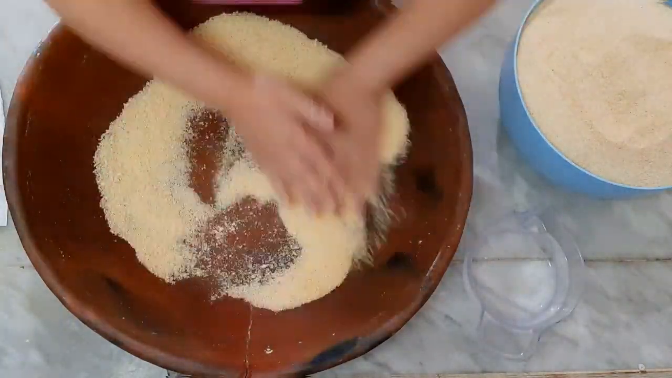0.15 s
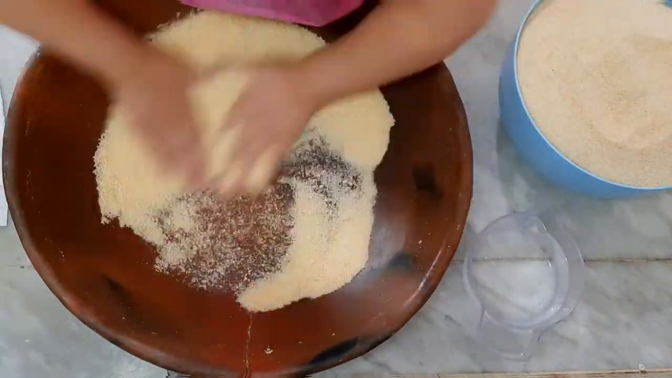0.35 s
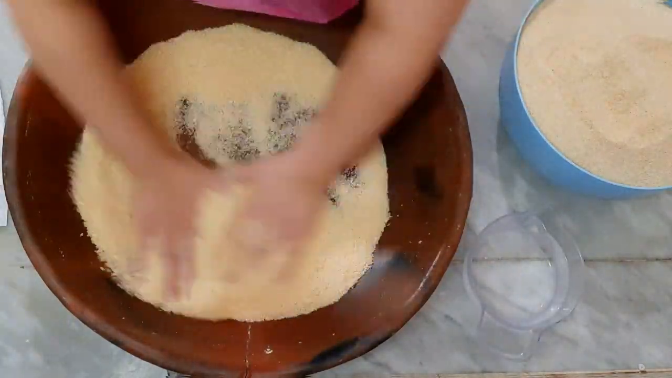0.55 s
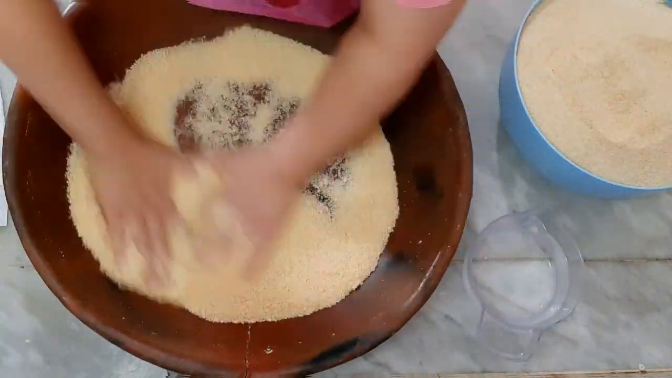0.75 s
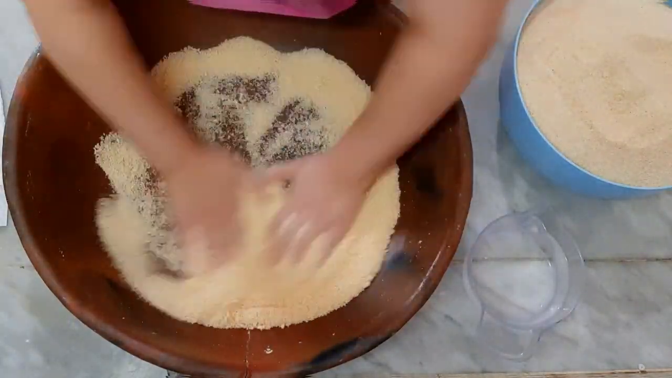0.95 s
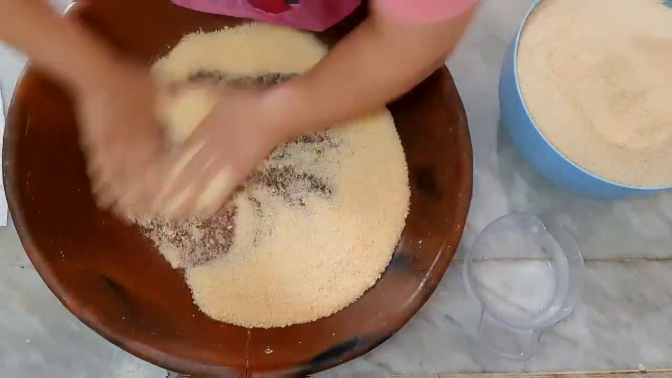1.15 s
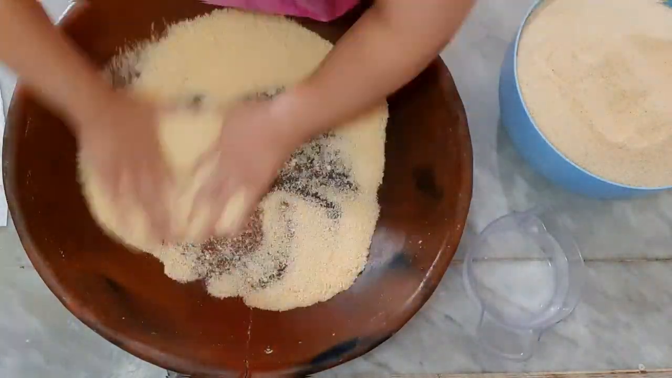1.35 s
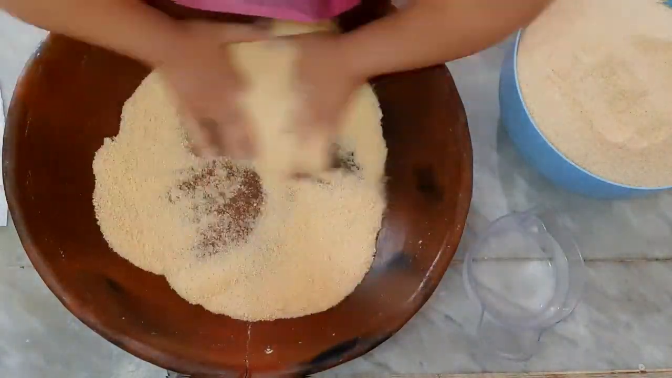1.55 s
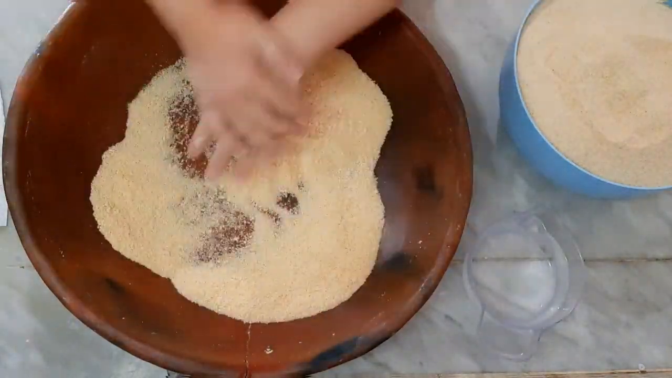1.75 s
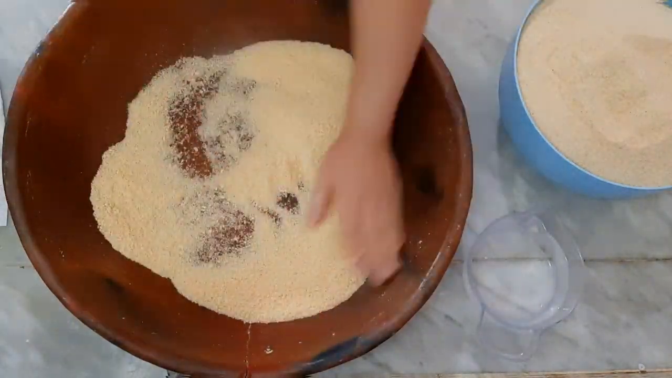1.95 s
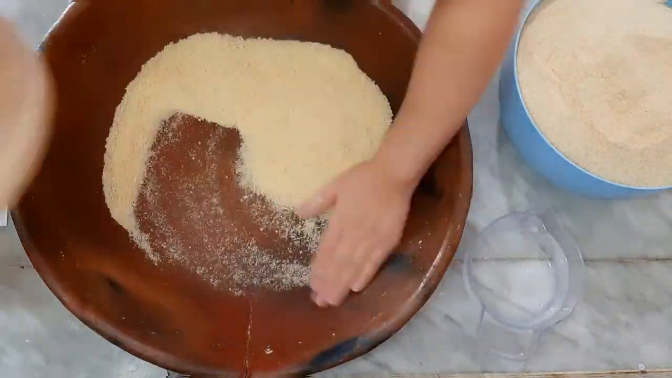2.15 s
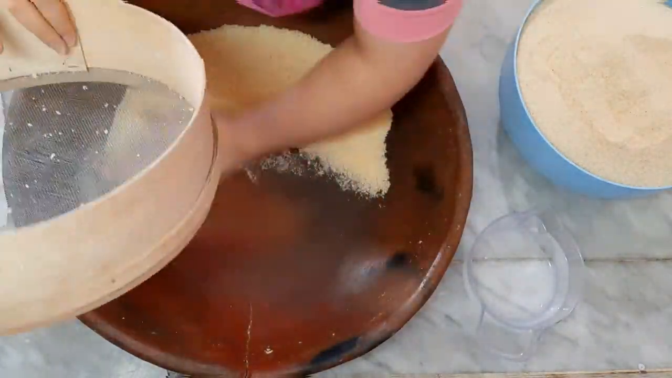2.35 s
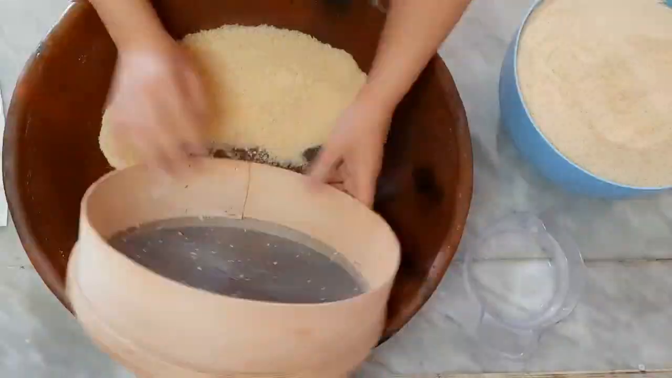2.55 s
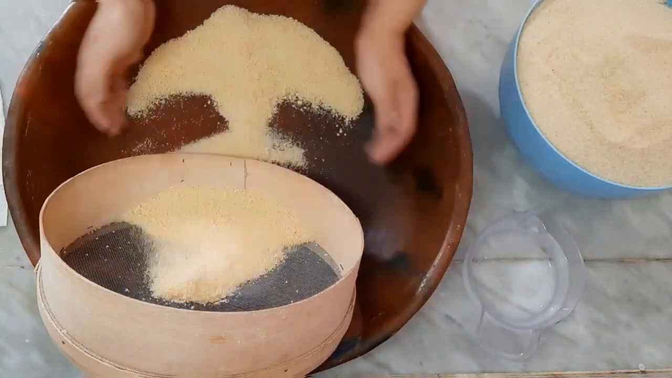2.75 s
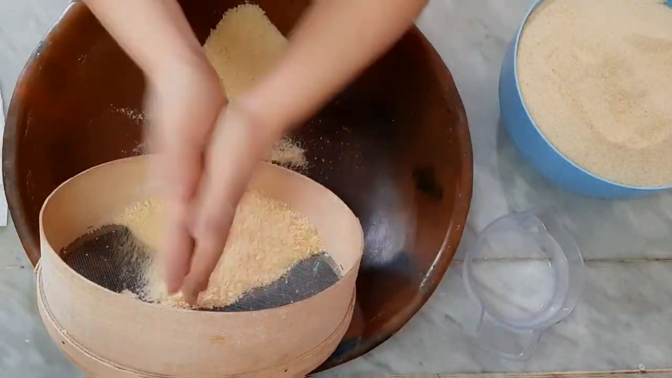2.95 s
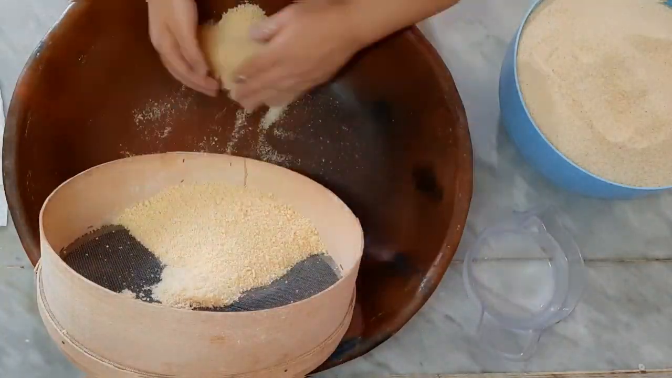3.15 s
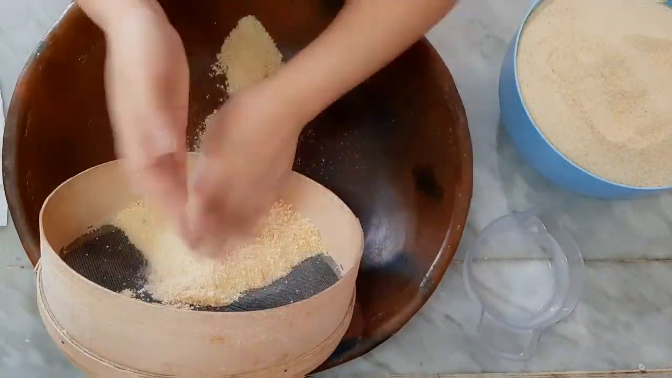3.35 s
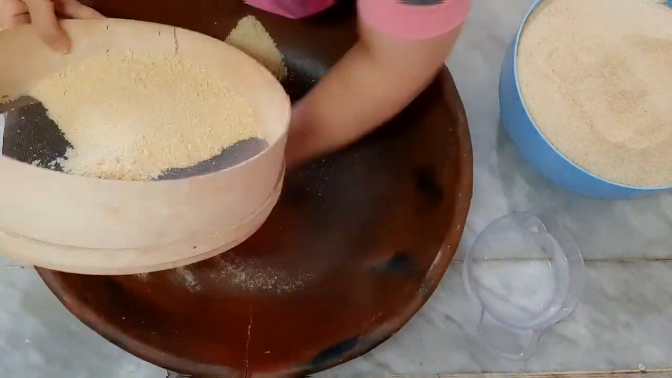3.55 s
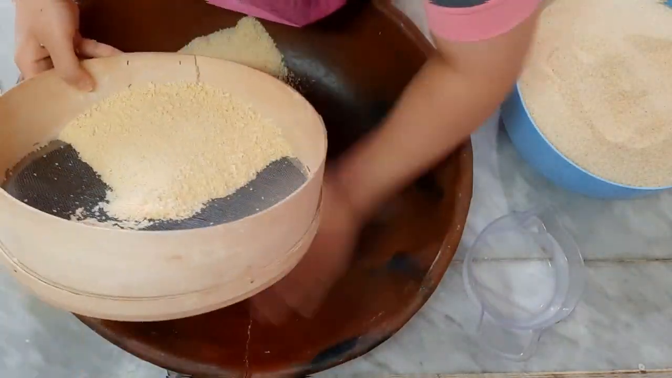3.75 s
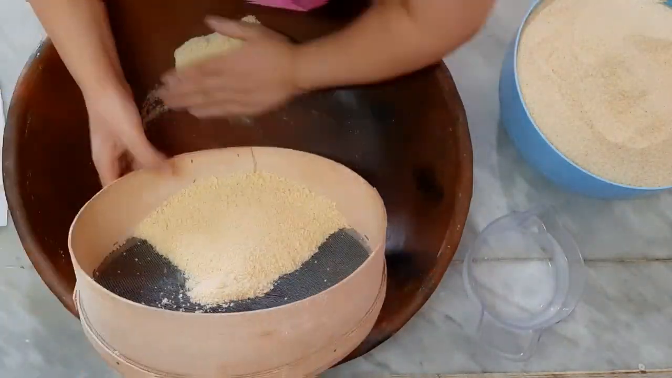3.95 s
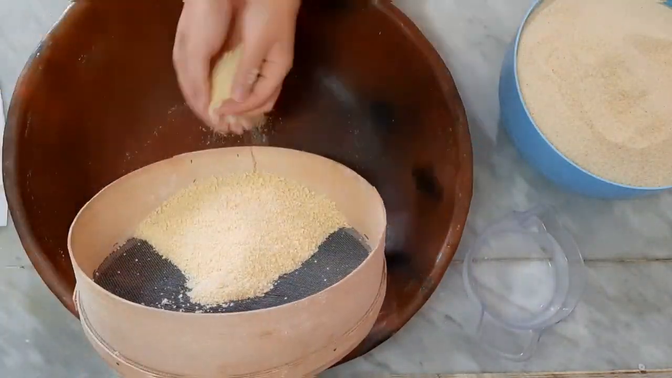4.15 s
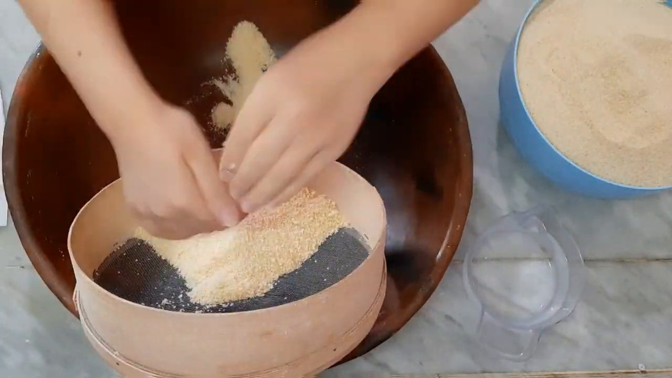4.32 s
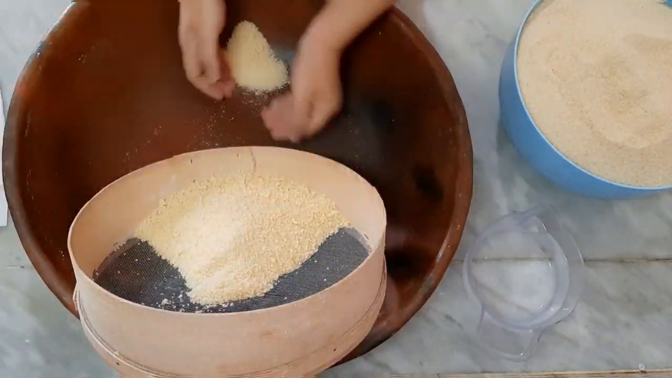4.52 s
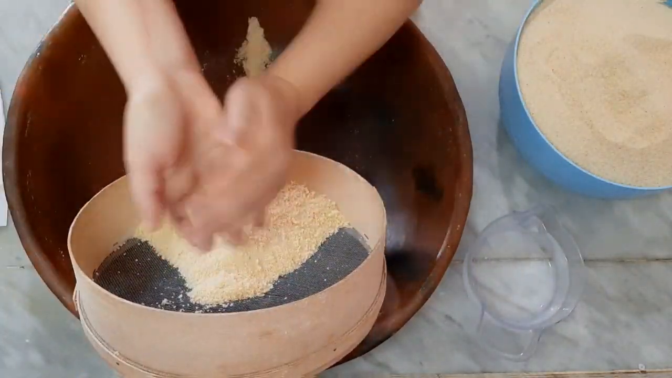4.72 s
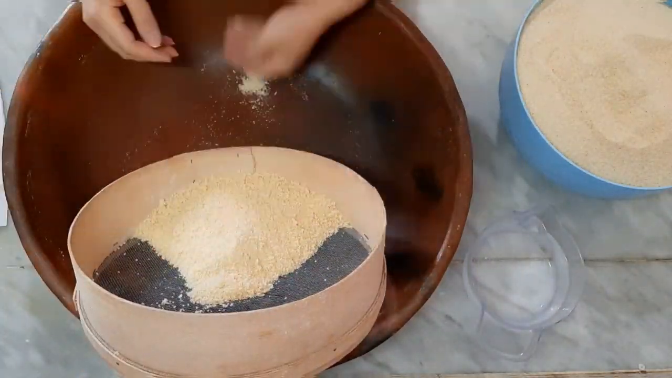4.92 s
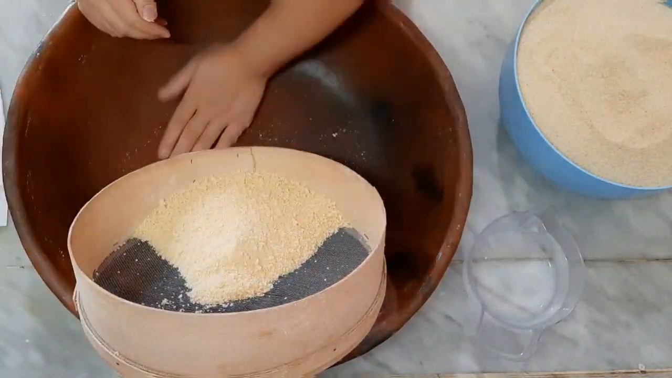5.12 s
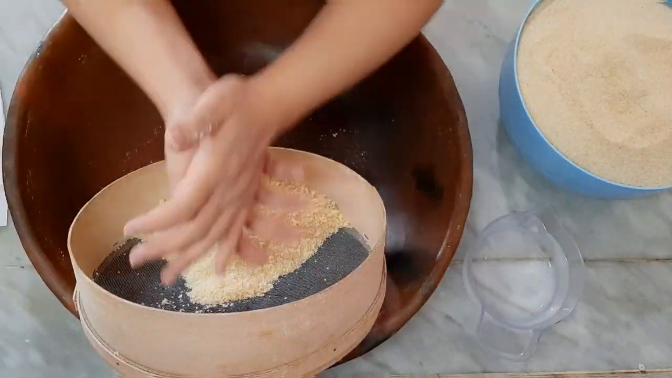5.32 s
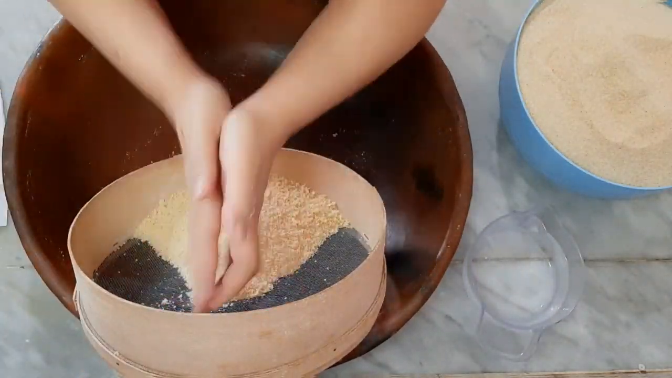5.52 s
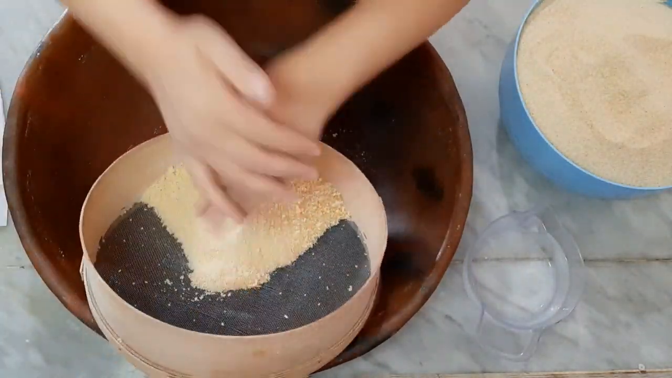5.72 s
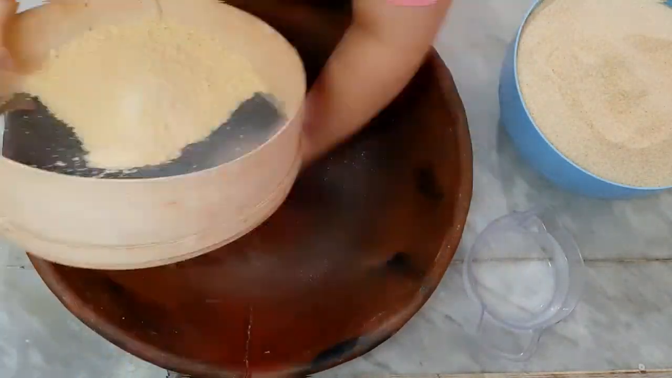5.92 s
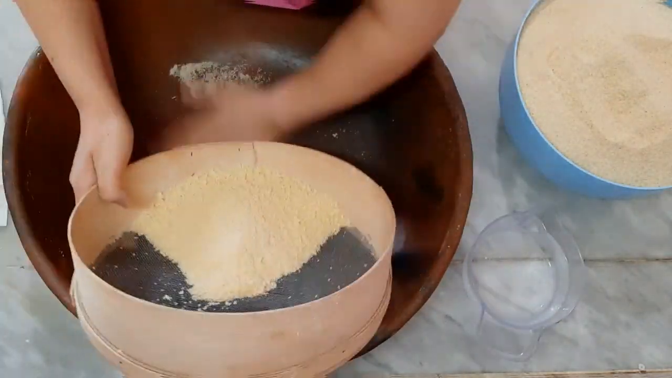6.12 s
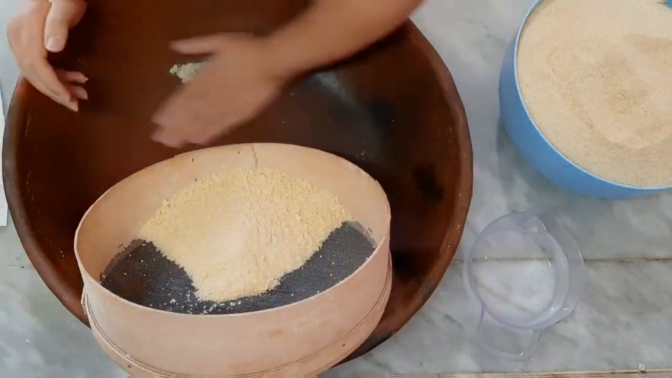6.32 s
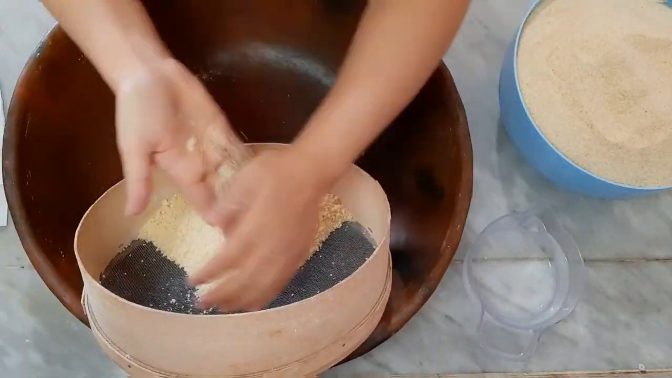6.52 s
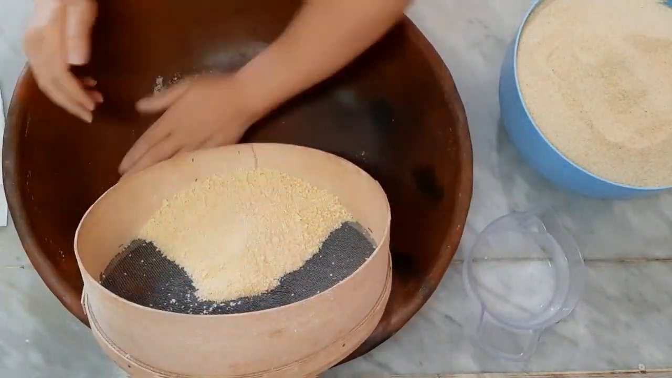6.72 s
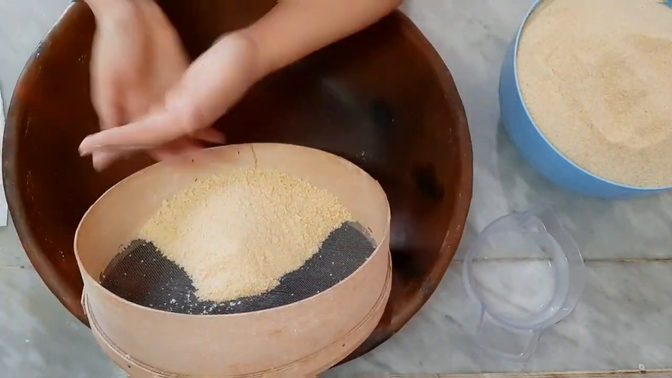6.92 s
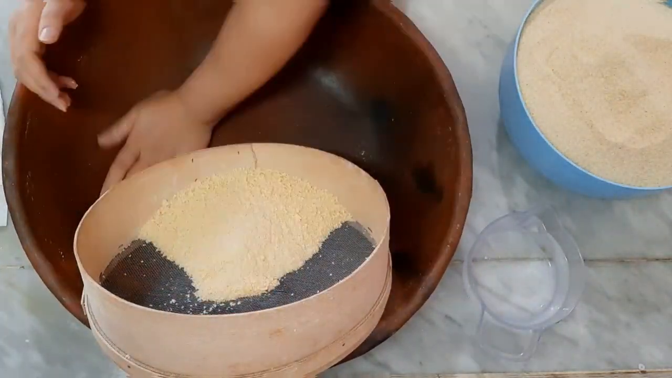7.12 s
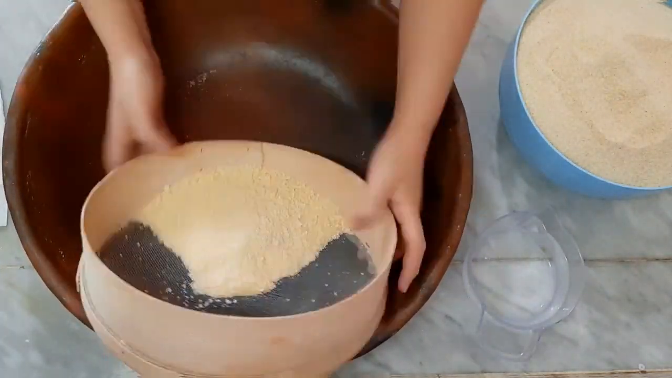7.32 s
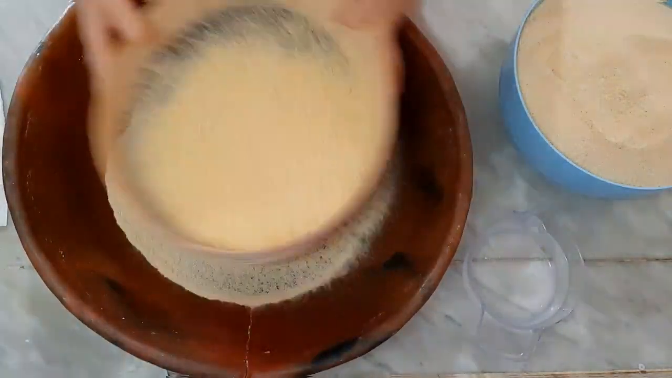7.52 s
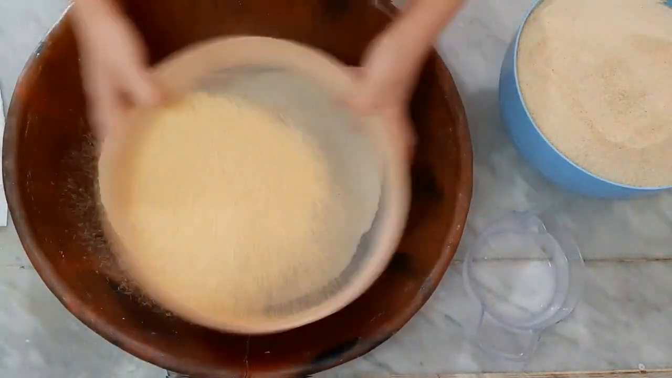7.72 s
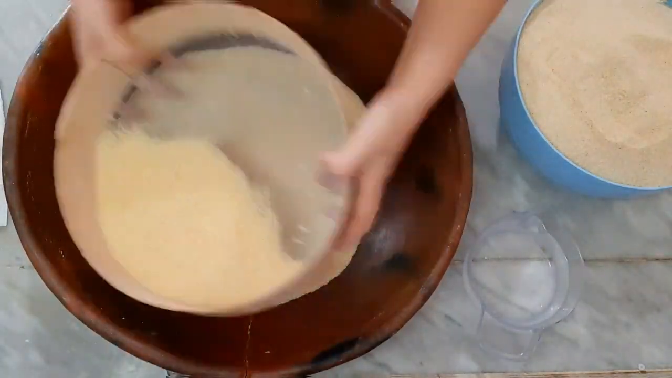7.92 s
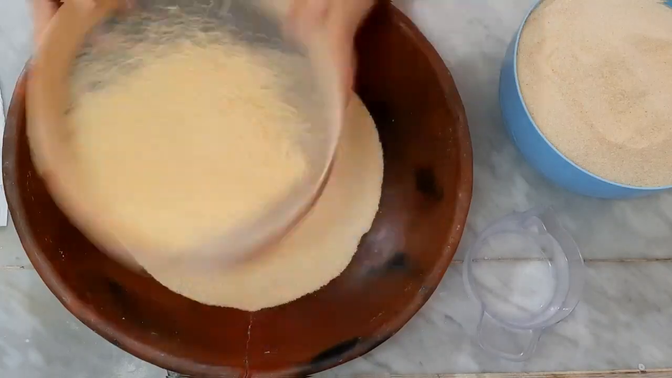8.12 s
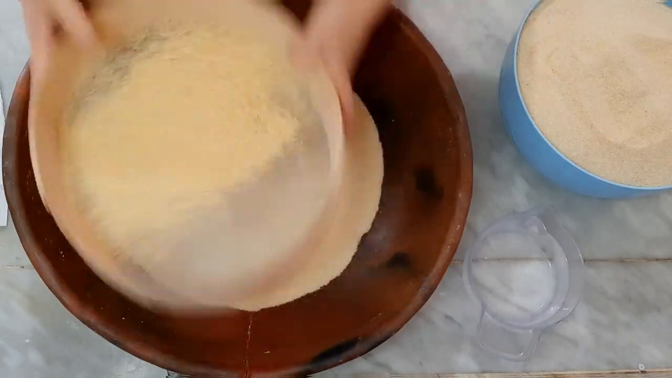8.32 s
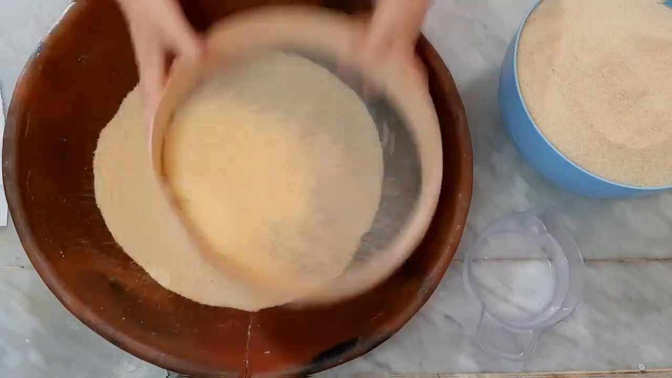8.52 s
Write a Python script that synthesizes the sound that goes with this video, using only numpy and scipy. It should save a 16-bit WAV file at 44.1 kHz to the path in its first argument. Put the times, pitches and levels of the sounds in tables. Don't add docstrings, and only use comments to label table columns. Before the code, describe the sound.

Fast-motion grain work: brisk scraping and swishing in a wide bowl, brief bangle rings, claps and wooden bumps, ending in shaken sieve hiss over kitchen hum.

```python
import sys
import numpy as np
from scipy import signal
from scipy.fft import rfft, irfft, next_fast_len
from scipy.io import wavfile
from scipy.ndimage import uniform_filter1d

SR = 44100
rng = np.random.default_rng(int(sys.argv[2]) if len(sys.argv) > 2 else 0)


def decibels_to_gain(level_db):
    exponent = np.asarray(level_db, float) / 20
    return 10 ** exponent


def store_pcm(level_fs):
    pcm = np.round(np.clip(level_fs, -1, 1) * 32767).astype(np.int16)
    wavfile.write(sys.argv[1], SR, np.atleast_2d(pcm).T)


N = 382347
LEAD_S = 0.02
HEAP_SPREAD_S = 1.6


def unit(x):
    return x / np.sqrt(np.mean(x ** 2) + 1e-20)


def along(points, hz):
    f, v = np.transpose(points)
    return np.interp(np.log(hz + 1), np.log(f + 1), v)


def filtered(x, response):
    m = next_fast_len(x.shape[-1] + 8192)
    hz = np.fft.rfftfreq(m, 1 / SR)
    return irfft(rfft(x, m) * response(hz), m)[..., :x.shape[-1]]


def resonant(modes):
    def mode(f, centre, width, db):
        return decibels_to_gain(db) * 1j * f * width / (centre * centre - f * f + 1j * f * width)
    return lambda f: sum((-1) ** k * mode(f, *row) for k, row in enumerate(modes))


def slice_of(ms, rise_ms, fall_ms):
    t = np.arange(-round(LEAD_S * SR), round((ms + 60) * SR / 1000)) / SR
    edge = lambda u: 1 / (1 + np.exp(-u))
    return t, edge(t * 1000 / rise_ms) * edge((ms - t * 1000) / fall_ms)


def lane(*shape):
    return np.zeros((*shape, N + SR))


def add(track, s, piece):
    start = round(s * SR)
    track[..., start:start + piece.shape[-1]] += piece


def trim(track):
    return track[..., round(LEAD_S * SR):][..., :N]


# frequency in Hz, likeness from 0 to 1.
ALIKE = [(60, 0.92), (250, 0.85), (500, 0.79), (800, 0.25), (2000, 0.037), (10000, 0.046), (15000, 0.67)]


def half_turn(hz):
    return np.arccos(np.clip(along(ALIKE, hz), -1, 1)) / 2


def rush(response, patchy_db, grain_db):
    sizes = decibels_to_gain(grain_db * unit(uniform_filter1d(rng.standard_normal(N), size=40)))
    z = signal.stft(sizes * rng.standard_normal((2, N)), nperseg=512)[2]
    field = uniform_filter1d(rng.standard_normal(z.shape[1:]), size=4, axis=0)
    field = uniform_filter1d(field, size=5, axis=1)
    pair = signal.istft(z * decibels_to_gain(patchy_db * unit(field)), nperseg=512)[1][:, :N]
    share = lambda hz: response(hz) * [np.cos(half_turn(hz)), np.sin(half_turn(hz))]
    mid, side = filtered(pair, share)
    return unit(np.array([mid + side, mid - side]))


# pitch in Hz, width in Hz, level in dB.
HUM = [(53.3, 18, -64.5), (92.4, 19, -67), (120.5, 15, -68.5), (163.6, 9.9, -65), (234, 65, -70),
       (2640, 320, -83.5), (5180, 480, -83)]
# frequency in Hz, level in dB per Hz.
ROOM = [(25, -2), (68, -2), (280, -12), (540, -8), (700, -13), (1500, -24), (1950, -38), (2650, -33),
        (3500, -42.5), (5200, -42.5), (8000, -38), (16000, -30)]


def kitchen():
    motor_hz, motor_db, drift = 55, -60, 0.0043
    lines = 0
    for hz, width, db in HUM:
        lines = lines + decibels_to_gain(db) * rush(lambda f: resonant([(hz, width, 0)])(f) ** 2, patchy_db=.6, grain_db=1)
    air = rush(lambda f: decibels_to_gain(along(ROOM, f)), patchy_db=.8, grain_db=.5)
    cycles = motor_hz * np.arange(N) / SR + drift * np.cumsum(rng.standard_normal(N))
    motor = filtered(np.sin(2 * np.pi * cycles), resonant([(motor_hz, 40, 0)]))
    return lines + decibels_to_gain(-65.5) * air + decibels_to_gain(motor_db) * unit(motor)


# time in seconds, sliding in dB,
# weight leaning on the table in dB.
SLIDING = [(0, -81, -75), (.34, -52.5, -60), (.82, -49.5, -55), (1.23, -52, -60), (1.49, -50, -58.5),
           (1.7, -62, -58.5), (1.98, -53.5, -54), (2.4, -64, -63), (2.7, -67, -54), (2.9, -61.5, -69),
           (3.47, -77, -56.5), (3.69, -78, -60.5), (3.85, -60.5, -48), (4.18, -69.5, -61), (5.5, -80, -65),
           (5.96, -64.5, -59.5), (6.18, -61, -58.5), (6.5, -75, -69.5)]
# time in seconds, level in dB.
SIFTING = [
    (6.9, -80),
    (7.53, -53),
    (7.99, -69),
    (8.26, -70),
    (8.67, -60),
]


def sliding_bed():
    t = np.arange(N) / SR
    s, sliding_db, table_db = np.transpose(SLIDING)
    sliding, table = decibels_to_gain(np.interp(t, s, sliding_db)), decibels_to_gain(np.interp(t, s, table_db))
    sifting = decibels_to_gain(np.interp(t, *np.transpose(SIFTING), left=-120))
    note_db = np.where(t < HEAP_SPREAD_S, -4, -16.5)
    return np.hypot(sliding, sifting), sliding * decibels_to_gain(note_db), table


def jumps(depth_db):
    steps = rng.standard_normal(N // 2200 + 1).repeat(2200)[:N]
    return decibels_to_gain(depth_db * uniform_filter1d(steps, size=500))


def strokes():
    rows = digs() + rubs() + rustles() + trickles() + scoops() + shakes()
    s, ms, db, note, scrape, fizz = np.transpose(rows)
    pressed = np.maximum(scrape, note - 6)
    fizz = fizz - 0.16 * (db + 47) - 1.5 * np.maximum(pressed - 7, 0)
    fizz += -3.5 * (s < HEAP_SPREAD_S)
    return zip(s, ms, db[:, None] + np.transpose([0 * db, note, scrape, fizz]))


# frequency in Hz, level in dB per Hz.
GRIT = [(600, -13.5), (1700, -1), (2500, 1), (3200, 0), (5000, -0.5), (6000, -3), (7500, -4.5),
        (9000, -19.5)]
SCRAPE = [(450, -1.5), (750, 2), (1100, 1.5), (1450, 0.5), (1800, -10.5), (2600, -11.5), (4200, -43.5)]
FIZZ = [(6000, -10), (7500, -5), (9000, -2), (10200, -3.5), (12000, 0.5), (13500, -0.5), (15800, -4)]
RUMBLE = [(50, -60), (80, -1), (200, 0.5), (350, -2.5), (500, -31)]
# pitch in Hz, width in Hz, height in dB.
GLAZE = [(1585, 440, 5.5), (2540, 260, 0), (3700, 300, 1), (4390, 980, -2.5), (5180, 150, 2)]
# pitch in Hz, width in Hz, level in dB.
HOLLOW = [(440, 130, 0), (640, 300, -9)]


def grain():
    power = lane(4)
    softer = np.array([[1], [1], [1.3], [1]])
    for s, ms, layers_db in strokes():
        shape = slice_of(ms, rise_ms=softer * (1.1 + .045 * ms), fall_ms=1.8 + .085 * ms)[1]
        add(power, s, (decibels_to_gain(layers_db[:, None]) * shape) ** 2)
    slow = uniform_filter1d(uniform_filter1d(rng.standard_normal((4, N)), size=300), size=300)
    clumps = decibels_to_gain(1.5 * unit(slow))
    grit, bowl, table = sliding_bed()
    under = jumps(depth_db=3.0) * np.array([decibels_to_gain(-9.0) * grit, bowl, decibels_to_gain(-6.5) * grit, decibels_to_gain(-16.0) * grit])
    grit, bowl, scrape, fizz = np.sqrt(trim(power) * clumps ** 2 + under ** 2)
    glaze_db = lambda f: sum(db / (1 + ((f - c) / w * 2) ** 2) for c, w, db in GLAZE)
    out = grit * rush(lambda f: decibels_to_gain(along(GRIT, f) + glaze_db(f)), patchy_db=1.2, grain_db=1.8)
    out += bowl * rush(lambda f: resonant(HOLLOW)(f) ** 2, patchy_db=1.5, grain_db=2)
    scraping = rush(lambda f: decibels_to_gain(along(SCRAPE, f) + glaze_db(f)), patchy_db=2.5, grain_db=3.2)
    out += decibels_to_gain(-0.53) * scrape * scraping
    out += 1.3 * fizz * rush(lambda f: decibels_to_gain(along(FIZZ, f)), patchy_db=.6, grain_db=1.8)
    rumble = rush(lambda f: decibels_to_gain(along(RUMBLE, f)), patchy_db=5.5, grain_db=-2.5)
    return out + decibels_to_gain(-0.5) * table * rumble


# start in seconds, length in ms, grit in dB,
# hollow note in dB over the grit.
DIGS = [(.001, 110, -63, 5), (.288, 83, -60, 3), (.397, 86, -60, 5.5), (0.431, 30, -59.5, 13.5),
        (0.532, 19, -63.5, 18), (0.794, 62, -56, 10), (1.534, 110, -61.5, 7), (2.554, 38, -50.5, 0),
        (2.601, 75, -62.5, 12), (2.645, 24, -57.5, -1), (2.801, 47, -59.5, 3), (3.088, 61, -53.5, 3),
        (3.153, 26, -52, 0), (3.4, 30, -67, 9), (3.859, 27, -50.5, 0.5), (3.972, 32.4, -52.5, 5),
        (4.102, 41, -61, 3), (4.985, 39, -70, 15.5), (5.519, 23, -68, 10), (5.682, 58, -72, 6),
        (5.902, 46, -70, 18), (5.92, 15, -59, 12), (5.934, 29.5, -50.5, 4.5), (6.081, 31, -49.5, 8),
        (6.171, 10, -64, 26), (6.39, 33, -71.5, 2), (6.827, 41.5, -61.5, -2), (7.339, 56, -60, 13)]


def digs():
    return [(s, ms, db, note, 4.5, -3) for s, ms, db, note in DIGS]


NOTE_PER_PRESS = 0.62

# start in seconds, length in ms, grit in dB,
# palm pressure in dB.
RUBS = [(.09, 89, -65.5, -5), (0.146, 56, -69.5, 7.5), (.639, 38, -67, 16), (.671, 50, -53.5, 4),
        (0.86, 25, -50.5, 6), (0.887, 60, -57, 19), (1.005, 20, -49.5, -1), (1.182, 42, -50, 1.5),
        (1.295, 44, -72.5, 22.5), (1.386, 50, -67.5, 9.5), (1.765, 26, -55, -1), (1.829, 23, -54, -1),
        (1.865, 27, -55, -14), (1.91, 46, -59.5, 1), (1.972, 88, -60, -2), (2.125, 43, -55.5, 1),
        (2.195, 38, -59, 5), (2.275, 21.5, -47.5, -1.5), (2.323, 25.6, -47, -1), (2.367, 22.5, -53.5, 4.5),
        (2.417, 46, -56, -0.5), (2.484, 28.6, -55, -0.5)]


def rubs():
    return [(s, ms, db, -8.5 + NOTE_PER_PRESS * press, press, -4) for s, ms, db, press in RUBS]


# start in seconds, length in ms, grit in dB.
RUSTLES = [(.235, 37, -72), (1.714, 125, -70), (6.152, 21, -53.5), (.751, 23, -77), (3.512, 15, -68),
           (4.202, 67, -65.5), (4.349, 28, -68), (4.538, 41, -63), (4.64, 95, -72), (4.716, 27, -65),
           (4.804, 26, -68), (4.853, 28, -69), (4.941, 29, -67.5), (5.048, 23, -65.5), (5.417, 28, -70.5),
           (5.487, 29, -65.5), (5.549, 58, -66), (5.756, 21, -65.5), (5.787, 24, -59), (5.855, 31, -67.5),
           (5.994, 12, -65), (6.49, 56, -68), (6.641, 38, -65), (6.985, 26, -67), (7.309, 8.9, -63)]


def rustles():
    return [(*row, -4, -7.5, -4) for row in RUSTLES]


# start in seconds, length in ms, level in dB, pitch in Hz,
# rattle in dB over the level.
TAPS = [
    (.64, 61, -43, 772, 2),
    (1.819, 1.3, -26, 435, -23),
    (3.949, 8.8, -25, 456, -10),
    (6.585, 58, -40.5, 264, 2.5),
    (7.0432, 4.5, -38.5, 436, -3),
]
KNOCKS = [(1.3, 31, -48, 695, 7.5), (2.548, 50, -47, 241, 9.5), (2.764, 34, -33, 152, 0),
          (3.086, 106, -37, 108.6, -1), (3.108, 7.1, -26, 122, -8), (3.157, 21.4, -31, 155, -6),
          (3.348, 12, -46.5, 260, -11), (5.62, 44, -41, 166, -2), (6.174, 30, -47, 418, 0.5),
          (7.341, 23, -30.5, 167.4, -4.5), (8.614, 9.7, -50, 307, 9), (8.649, 30, -45, 302, -9),
          (8.652, 25, -43, 2510, -18)]
MORE_KNOCKS = [
    (2.367, 13, -47, 93.5, -19),
    (2.566, 38, -40, 246, 3.5),
    (2.626, 12, -36, 155, 1.5),
    (3.43, 52, -40.5, 100.5, -8),
    (4.39, 30, -49, 250, -3),
    (7.488, 14, -38, 108, -20),
    (7.612, 27, -42.5, 113, -14),
    (8.546, 27, -40.5, 109, -13.5),
]
# pitch in Hz, width in Hz, level in dB.
BOWL = [(302, 295, 3), (423, 318, 0), (570, 42, -0.5), (935, 310, -9.5), (1070, 225, -10.5)]


def knocks():
    out = lane(2)
    rattle = rush(resonant(BOWL), patchy_db=5.5, grain_db=0.5)
    kinds = [(TAPS, 0.18), (KNOCKS, 1), (MORE_KNOCKS, 0.93)]
    blows = [(*row, rise_ms) for rows, rise_ms in kinds for row in rows]
    ratios, gains = (.62, 1, 1.3, 1.9), (0.91, 1.4, 0.68, 0.23)
    for s, ms, db, hz, rattle_db, rise_ms in blows:
        t, shape = slice_of(ms, rise_ms=rise_ms + 0.057, fall_ms=7.2)
        shape *= decibels_to_gain(-np.abs(t) * 250 / (rise_ms + 0.6) ** 2)
        phases = rng.random(4)
        low = sum(g * np.sin(2 * np.pi * (hz * k * t + p)) for k, g, p in zip(ratios, gains, phases))
        low = decibels_to_gain(np.array([[.8], [-.8]])) * np.array([np.roll(low, shift=-6), low])
        shaken = rattle[:, round(s * SR * .9):][:, :len(t)]
        add(out, s, decibels_to_gain(db) * shape * (low + decibels_to_gain(rattle_db) * shaken))
    return trim(out)


def bursts(rows, sharpness=7.1):
    out = lane(2)
    for s, ms, db, hz in rows:
        t, shape = slice_of(ms, rise_ms=0.069 * ms, fall_ms=0.088 * ms)
        noise = rng.standard_normal((2, len(t)))
        mid, side = filtered(noise, lambda f: resonant([(hz, hz / sharpness, 0)])(f) ** 2)
        turn = half_turn(hz)
        burst = shape * (np.cos(turn) * mid + np.sin(turn) * side * np.array([[1], [-1]]))
        add(out, s, decibels_to_gain(db) * unit(burst) * np.sqrt(np.mean(shape ** 2)))
    return trim(out)


# start in seconds, length in ms, level in dB, # pitch in Hz.
MORE_BURSTS = [(.64, 24, -46, 726), (.895, 67, -57, 2490), (2.555, 43, -47, 960), (2.77, 10, -30.5, 59),
               (2.815, 29, -57, 128), (3.165, 12, -55, 1300), (7.343, 16, -51, 588), (7.346, 12, -55, 1220),
               (7.364, 23, -33.5, 160), (7.392, 20, -48, 130), (.996, 8, -43, 503), (2.775, 16, -33, 203)]


def more_bursts():
    return bursts(MORE_BURSTS)


# start in seconds, length in ms, level in dB, pitch in Hz.
CATCHES = [(.643, 24.6, -40, 1205), (.895, 40, -44, 1340), (.905, 32, -50, 2260), (1.3, 21, -41, 800),
           (1.301, 14, -51, 312), (2.275, 15, -43, 1420), (2.322, 17, -46, 1470), (2.418, 35, -52.5, 1440),
           (2.488, 16, -60, 1460), (2.578, 11.5, -29.5, 444), (2.762, 19, -39, 900), (3.113, 11, -41, 1000),
           (3.57, 21, -51.5, 1600), (3.745, 15, -46, 1350), (4.043, 16, -57.5, 1605),
           (5.525, 18, -61.5, 1530), (5.594, 15.5, -51.5, 392), (5.701, 21, -62, 1090),
           (5.935, 24, -49.5, 1650), (6.011, 16, -46, 1070), (6.02, 10, -57, 2560), (6.088, 12, -53, 1640),
           (6.134, 13, -49, 4900), (6.152, 26, -55, 1630), (6.187, 9, -34.5, 425), (6.201, 38, -44, 1650),
           (6.276, 14, -57, 1480), (6.318, 22, -54, 2440), (6.346, 34, -50.5, 1650),
           (6.586, 21, -47.5, 977), (6.765, 22, -59, 1320), (7.151, 21, -55, 1650)]


def catches():
    return bursts(CATCHES)


# time in seconds,
# peak in dB, pitch in Hz.
SNAPS = [(0.643, -30, 900), (0.6447, -36, 1100), (.901, -37, 2000), (0.9143, -29, 1700), (0.919, -31, 2300),
         (.9245, -41, 2900), (0.928, -38, 1900), (0.941, -36, 1500), (6.0958, -35, 1550),
         (6.144, -34, 4700), (6.2155, -40, 1600), (6.223, -37, 1670), (6.18, -34, 330),
         (1.8201, -11.5, 4370), (1.8213, -12, 7000), (3.435, -39, 750)]


def snaps():
    out, t = lane(), np.arange(SR // 20) / SR - LEAD_S
    for s, db, hz in SNAPS:
        fade = (t > 0) * np.exp(-np.abs(t) * hz / 1.6)
        add(out, s, decibels_to_gain(db) * fade * np.sin(2 * np.pi * hz * t))
    return trim(np.array([np.roll(out, shift=-2), out]))


# start in seconds, length in ms, level in dB.
BANGLE = [
    (0.672, 22.6, -49.5),
    (.970, 12, -51.5),
    (1.004, 26, -44.5),
]
# pitch in Hz, then level in dB in the first, second and third touch.
STEEL = [(1086, 1, -31, -0.5), (2320, -3, -20, -16), (3960, -4, -20, -3), (4330, -8, -9, -23),
         (5970, 2, -20, -5.5), (6420, -2, -7, -22), (7840, 1, 1, -14), (8500, -6, -22, -8),
         (9400, -11, -20, -7), (10890, 7, -12, -18), (11500, -12, -20, -10), (12100, -20, 2, -10),
         (12700, -20, -8, -8), (13700, -20, -3, -13)]


def bangle():
    out = lane(2)
    for touch, (s, ms, db) in enumerate(BANGLE):
        for hz, *levels in STEEL:
            t, shape = slice_of(ms, rise_ms=.6 + 1.5 * rng.random(), fall_ms=1 + 2.5 * rng.random())
            swell = decibels_to_gain(-20 * (t * 1000 / ms - .68) ** 2)
            ring_db = -5 - 60 * np.abs(t - ms / 1000) / .1 - abs(hz - 4000) / 100
            shape = shape * swell + decibels_to_gain(ring_db) * (t > 0)
            flutter = 1 + .45 * np.sin(2 * np.pi * (rng.uniform(20, 60) * t + rng.random((2, 1))))
            wander = .25 * rng.random((2, 1)) + np.cumsum(rng.normal(0, .003 + hz * 6e-7, len(t)))
            wander = wander + rng.normal(0, .15) * hz * t * t
            tone = np.sin(2 * np.pi * (hz * t + wander))
            add(out, s, decibels_to_gain(db + levels[touch]) * shape * flutter * tone)
    return trim(out)


# start in seconds,
# length in ms, level in dB, pitch in Hz.
TICKS = [(.87, 20, -59, 2900), (.9, 32, -44.5, 1860), (0.911, 16, -52, 2930), (3.35, 7.7, -54, 1750),
         (3.448, 7.2, -56, 3420), (4.354, 21, -62.5, 3620), (4.722, 11, -66, 3930),
         (4.812, 16, -67.5, 3640), (4.95, 27, -64, 1500), (5.052, 18, -63.5, 3030), (6.14, 6, -58, 3020),
         (1.825, 2.8, -33, 4400)]


def ticks():
    return bursts(TICKS)


# start in seconds, length in ms, level in dB, pitch in Hz.
SPRAY = [
    (1.832, 23, -43, 5800),
    (1.8165, 3, -38, 3800),
    (.89, 48, -48.5, 1870),
]


def spray():
    return bursts(SPRAY, sharpness=1.1)


# start in
# seconds, length in ms, grit in dB.
TRICKLES = [(.97, 16, -56), (2.885, 28, -75), (3.0, 48, -78), (3.465, 27, -71.5), (3.55, 51, -68.5),
            (3.655, 51, -60), (4.332, 55, -73.5), (4.75, 31, -72.5), (4.82, 51, -79), (4.938, 19, -85),
            (5.757, 14, -74), (6.155, 22, -70), (6.318, 59, -65.5), (6.761, 26, -71.5), (6.823, 43, -69)]


def trickles():
    return [(*row, -29, -7.5, 4.5) for row in TRICKLES]


# time in seconds, level in dB, length in ms, spray in dB over the level,
# first crack in dB.
CLAPS = [
    (1.8190, -23.5, 2.6, -8, -13.5),
    (5.797, -47.5, 5, -8.5, -34.5),
    (7.0426, -33, 2, -11, -25),
]
# pitch in Hz, width in Hz, level in dB.
CUPS = [
    [(453, 250, -12), (1500, 200, 2), (2610, 360, 0), (4400, 1100, -3), (5500, 600, -13.5),
     (6900, 1500, -7), (9400, 2000, -7), (12100, 900, -9), (14900, 900, -21)],
    [(413, 85, 4), (1440, 110, 3.5), (2400, 300, -14), (3650, 320, -9), (4620, 400, -22), (9000, 8000, -37)],
    [(1360, 530, 4), (2060, 630, -1.5), (3480, 730, -5.5), (4700, 510, -10), (7500, 2700, -34),
     (11500, 790, -8), (13600, 2300, -14)],
]


def claps():
    out = lane(2)
    for (s, db, ms, spray_db, crack_db), cup in zip(CLAPS, CUPS):
        t, shape = slice_of(ms, rise_ms=.4, fall_ms=.5)
        shape = shape + decibels_to_gain(spray_db - 60 * np.abs(t) / 0.097) * (t > 0)
        colour = lambda f: np.sqrt(sum(np.abs(resonant([mode])(f)) ** 2 for mode in cup))
        crack = filtered(1. * (t == 0), resonant(cup))
        add(out, s, decibels_to_gain(crack_db) * crack / np.abs(crack).max())
        noise = unit(filtered(shape * rng.standard_normal((2, len(t))), colour))
        add(out, s, decibels_to_gain(db) * noise * np.sqrt(np.mean(shape ** 2)))
    return trim(out)


# start in seconds, length in ms, level in dB, pitch in Hz.
THUDS = [(2.545, 21, -45, 570), (2.629, 37, -37.5, 158), (2.625, 17, -40, 482), (2.765, 39, -44, 547),
         (3.107, 23, -40, 530), (3.123, 26, -41, 375), (3.165, 13, -44.5, 580), (3.184, 13, -47, 182),
         (3.969, 21, -41.5, 189), (4.015, 24, -49.5, 180), (4.41, 19, -43.5, 260), (5.622, 19, -52, 540)]


def thuds():
    return bursts(THUDS)


# start in seconds, length in ms, grit in dB,
# palm pressure in dB.
SCOOPS = [(2.716, 22, -50.5, -4), (2.735, 22, -41, -6), (2.76, 35, -53, 8), (2.92, 77, -58, -12),
          (3.217, 39, -53, -1), (3.344, 41, -61, 3.5), (3.44, 19, -56, 1), (3.569, 46, -59, 7.5),
          (3.658, 48.4, -51.5, 4.5), (3.74, 37, -47.5, 3), (3.802, 24, -44, -4.5), (3.915, 29, -55.5, -0.5),
          (4.04, 26, -60.5, 5.5), (4.382, 36, -60, -6), (4.468, 50, -56, 3), (5.114, 66, -57.5, 7),
          (5.226, 99, -70, 6.5), (5.613, 49, -54, -13), (6.007, 30.4, -48, -6.5), (6.131, 18, -51.5, -18),
          (6.201, 42.4, -48, 5.5), (6.27, 21, -56, -2), (6.319, 32, -58.5, 4), (6.34, 44.4, -56, 7.5),
          (6.584, 37, -56, 3.5), (6.764, 24, -64.5, 4), (7.139, 47, -59.5, 3.5), (7.222, 50, -60.5, 1)]


def scoops():
    return [(s, ms, db, -5.5 + NOTE_PER_PRESS * press, press, -6) for s, ms, db, press in SCOOPS]


# start in seconds, length in ms, grit in dB.
SHAKES = [(7.388, 43, -55.5), (7.434, 59, -56.5), (7.491, 40, -51), (7.539, 38, -55), (7.584, 53, -52),
          (7.647, 35, -47.5), (7.698, 44, -47.5), (7.749, 44, -50), (7.79, 104, -54), (7.923, 63, -55.5),
          (7.994, 63, -48), (8.064, 47, -50.5), (8.109, 55, -50.5), (8.163, 62, -46), (8.232, 75, -46.5),
          (8.287, 103, -49), (8.388, 260, -47), (8.513, 48, -50), (8.614, 24.2, -43.5), (8.652, 39, -41)]


def shakes():
    return [(*row, -29, -5, -6.5) for row in SHAKES]


def scene():
    out = kitchen() + grain() + knocks() + more_bursts() + catches() + snaps()
    return out + bangle() + ticks() + spray() + claps() + thuds()


# frequency in Hz, level in dB.
LEFT_PORT = [(1500, 0.5), (2200, 5), (4700, 6.5), (5700, 2), (7000, -1), (8500, -36.5), (9900, -22),
             (11000, -27), (13000, -13), (14800, -5.5)]


def two_ports(x):
    limit = lambda f: decibels_to_gain(-40 / (1 + np.exp((15850 - f) / 60)))
    left_only = np.array([[1], [0]])
    return filtered(x, lambda f: limit(f) * decibels_to_gain(along(LEFT_PORT, f) * left_only))


# time in seconds, depth in dB.
HUSHES = [
    (.226, -8),
    (1.7, -10),
    (1.808, -9),
    (2.11, -8),
    (2.25, -9),
    (5.84, -12),
]


def treble_dips(x):
    t = np.arange(N) / SR
    hush = decibels_to_gain(sum(db * np.exp(-((t - s) / 0.007) ** 2) for s, db in HUSHES))
    treble = filtered(x, lambda f: f * f / (f * f + 900 ** 2))
    return x - (1 - hush) * treble


def low_pass(x):
    return signal.sosfilt(signal.butter(12, 16890, fs=SR, output="sos"), x)


def record(dry):
    mix = treble_dips(two_ports(dry))
    return low_pass(mix)


dry = scene()
out = record(dry)
store_pcm(out)
```